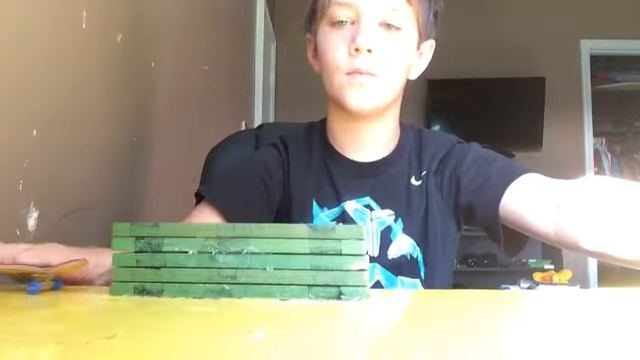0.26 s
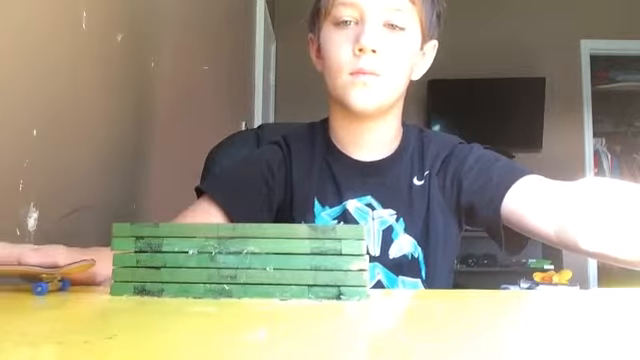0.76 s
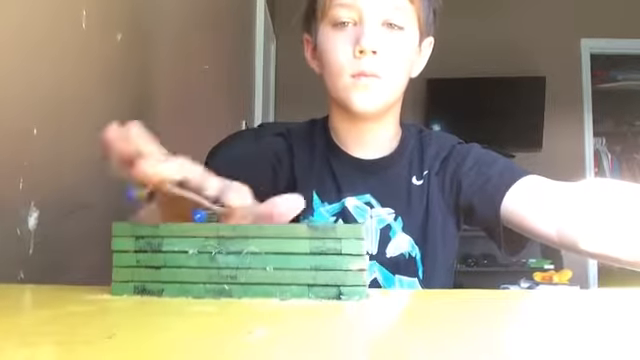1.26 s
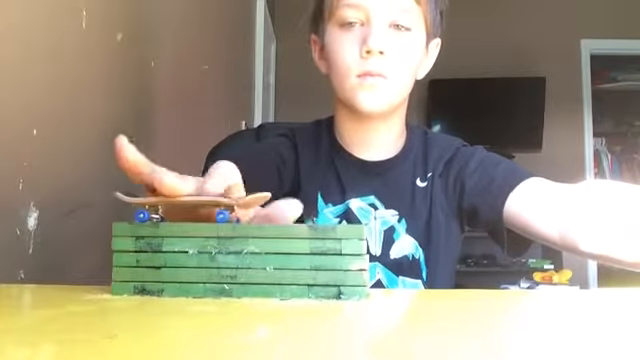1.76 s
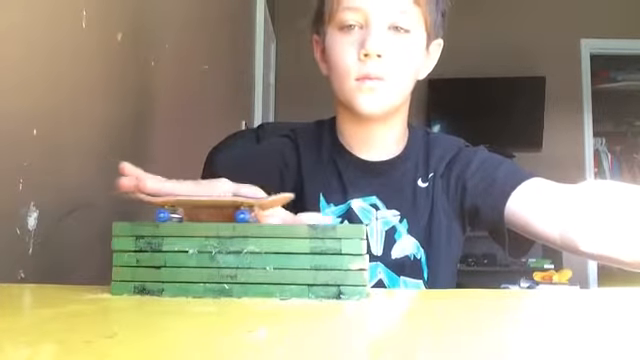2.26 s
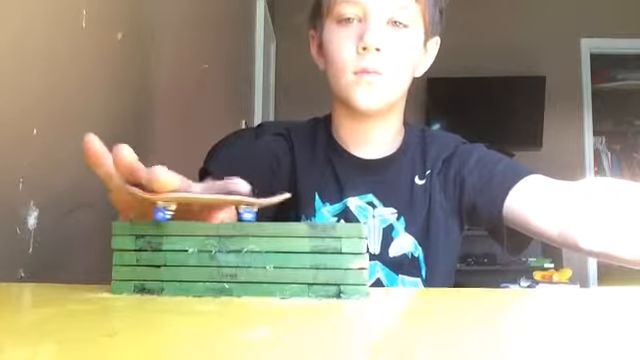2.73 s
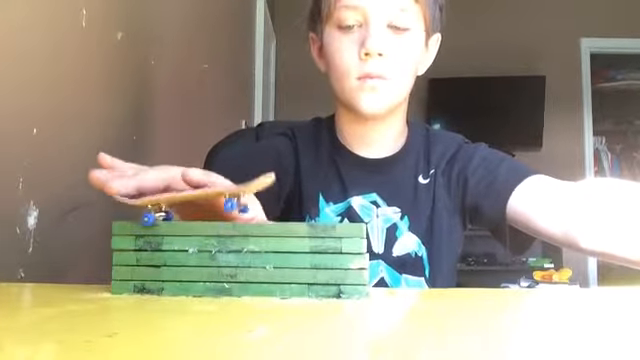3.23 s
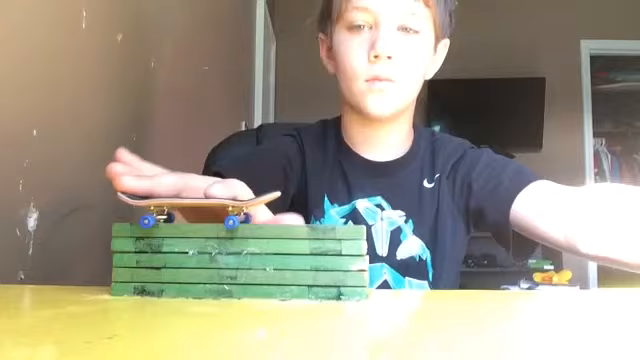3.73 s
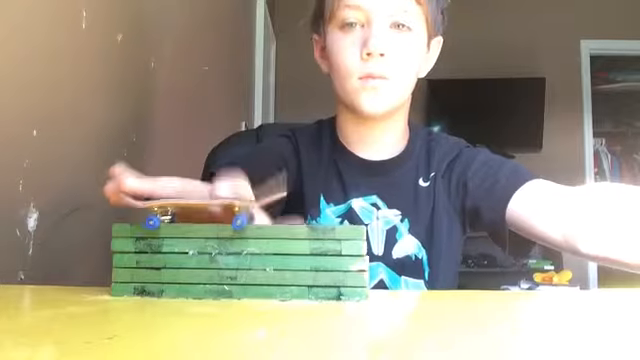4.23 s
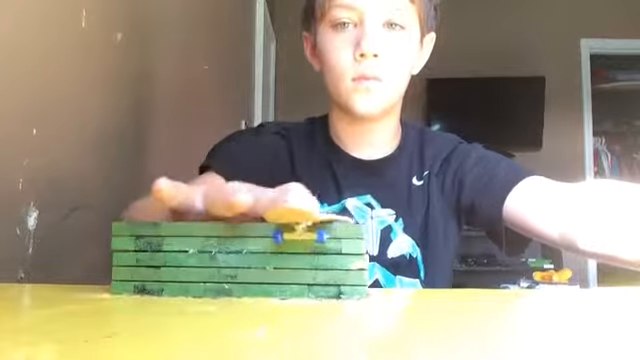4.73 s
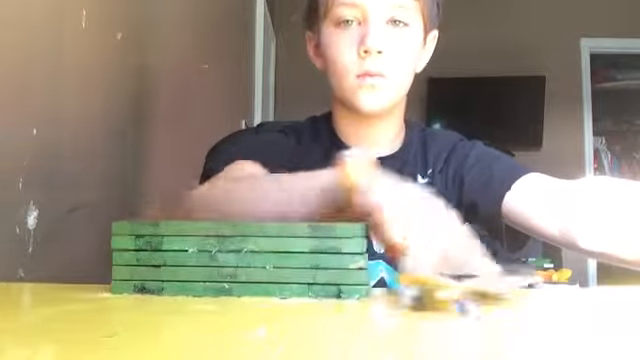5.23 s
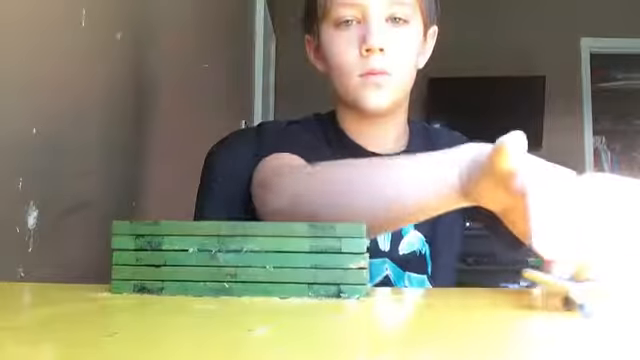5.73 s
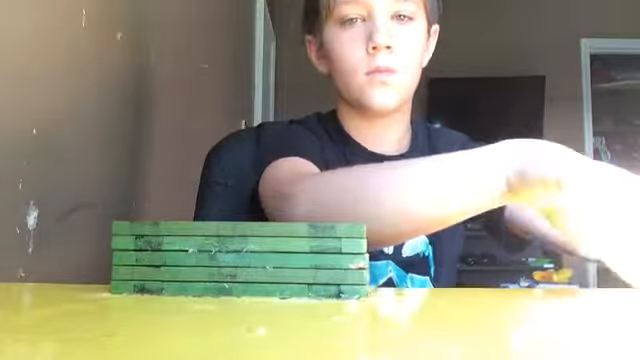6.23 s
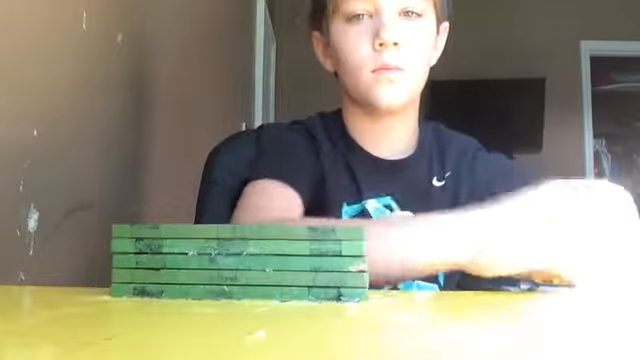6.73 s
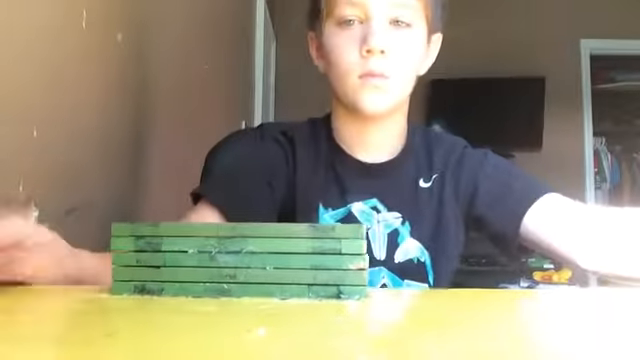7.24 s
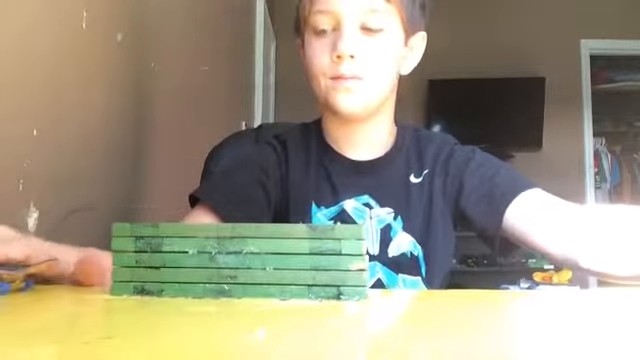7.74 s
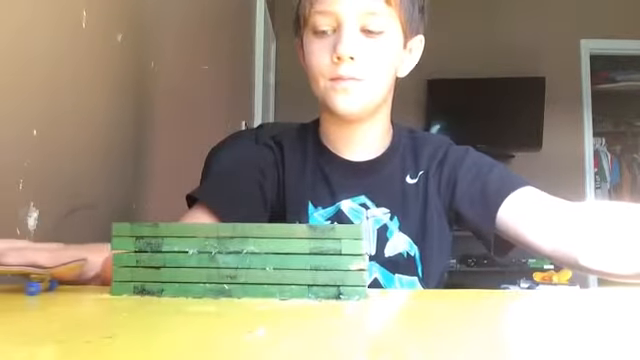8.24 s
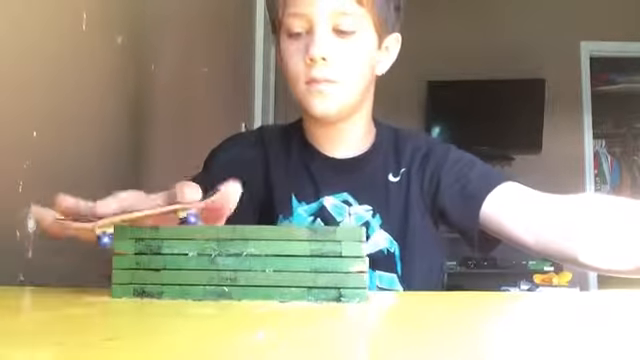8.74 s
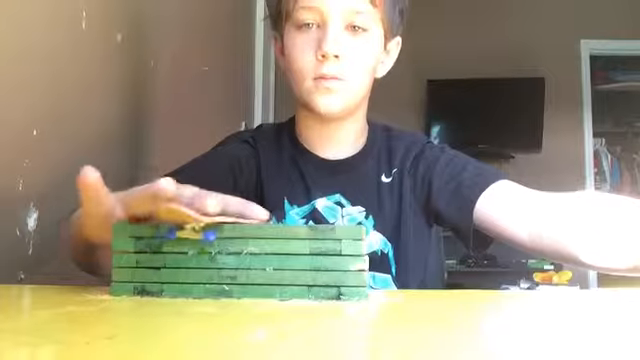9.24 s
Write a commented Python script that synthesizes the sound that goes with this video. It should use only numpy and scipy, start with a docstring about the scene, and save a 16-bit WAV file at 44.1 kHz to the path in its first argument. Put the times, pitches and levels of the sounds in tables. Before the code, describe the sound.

Close, dry wooden clacks with bright metallic clicks over very faint room hum and hiss. Small hard wheels whirr in short pushes, rattling on planks and smoother on the bare table, now and then whistling thinly. Quick rasping scrapes precede pops, and heavier landings boom low in the tabletop. Bursts of tricks alternate with quiet gaps, in a small room with short reflections.

```python
"""A brief whirr of small wheels over faint room tone, then wood clacks: a wooden fingerboard does tricks
on a table and a stack of planks, close to a small microphone in a furnished room.
Clacks, scrapes and wheels are noise filtered by the wood's resonances; the tabletop booms as decaying sines.
Wheels whirr in short pushes, rattling on the planks, and rubbing wheels whistle as narrow noise.
The recorder's limiter holds down peaks and its band limit cuts the top."""
import sys
import numpy as np
from scipy import signal
from scipy.fft import rfft, irfft, next_fast_len
from scipy.io import wavfile
from scipy.ndimage import uniform_filter1d, minimum_filter1d, map_coordinates

SR = 44100
rng = np.random.default_rng(int(sys.argv[2]) if len(sys.argv) > 2 else 0)


def file_out(sig):
    """Save sig as 16-bit WAV at sys.argv[1]."""
    # one column per channel
    cols = np.atleast_2d(sig).T
    # limit, then scale
    lim = np.clip(cols, -1, 1)
    pcm = np.round(lim * 32767).astype(np.int16)
    wavfile.write(sys.argv[1], SR, pcm)


N = 418509

# colour of deck knocks: f/Hz, gain/dB
KNOCK_COLOUR = [(250, -32), (450, -9), (650, -1.5), (1000, 0), (1500, 2.5), (2300, 2.5), (3300, 5),
                (4200, -8), (6000, -41.5)]
# colour of bright metal clicks and fine hiss: f/Hz, gain/dB
CLICK_COLOUR = [(2800, -21.5), (4700, -1.5), (7500, -3), (8500, -10), (11000, -13), (15000, -21)]
# what lies under the board: t/s, surface (0 table .. 1 planks)
SURFACE_BELOW = [(1.15, 0), (1.3, 1), (5.19, 1), (5.22, 0), (8.65, 0), (8.75, 1)]


def amp(db):
    """Decibels to gain."""
    return 10 ** (np.asarray(db) / 20)


def unit(x):
    """x at rms 1."""
    return x / np.sqrt(np.mean(x ** 2) + 1e-20)


def along(points, hz):
    """(f/Hz, value) points read on a log frequency axis."""
    f, v = np.transpose(points)
    return np.interp(np.log(hz + 1), np.log(f + 1), v)


def wobble(rate):
    """A random curve of straight lines, rate knots a second."""
    knots = rng.standard_normal(int(N * rate / SR) + 4)
    return map_coordinates(knots, [np.arange(N) * rate / SR], order=1)


def coloured(x, gain):
    """x through the causal minimum-phase filter with the given gain of frequency."""
    m = 2 * next_fast_len(len(x) // 2 + 2048)
    cepstrum = irfft(np.log(np.maximum(gain(np.fft.rfftfreq(m, 1 / SR)), 1e-6)))
    # folding the cepstrum forward in time makes the filter causal
    cepstrum[1:m // 2] *= 2
    cepstrum[m // 2 + 1:] = 0
    return irfft(rfft(x, m) * np.exp(rfft(cepstrum)), m)[:len(x)]


def resonance(hz, centre_hz, width_hz, db):
    """Gain of one peak whose power, db, adds to a flat response."""
    return np.sqrt(1 + amp(db) ** 2 / (1 + (2 * (hz - centre_hz) / width_hz) ** 2))


def wood(points, ring_db, spread_db=0):
    """Gain of a colour with the wood's resonances on it; their strengths depend on where it is touched."""
    # resonances of board, planks and table: f/Hz, width/Hz, strength/dB before ring_db and spread
    body_rings = [(158, 26, 1.5), (249.7, 8.3, 2), (331.4, 19, 5.5), (458, 63, 4), (567, 49, 3),
                  (639, 59, 5), (825, 93, 4.5), (1016, 12, -1), (1208, 55, -2), (1460, 160, 0),
                  (1772, 110, -4.5), (2192, 90, 0), (2454, 51, 1), (2728, 210, -8), (3085, 60, -4.5),
                  (5170, 130, -4), (6600, 130, -5.5)]
    strengths = ring_db + spread_db * rng.standard_normal(len(body_rings))

    def gain(hz):
        peaks = sum(amp(db + more) ** 2 / (1 + (2 * (hz - centre_hz) / width_hz) ** 2)
                    for (centre_hz, width_hz, db), more in zip(body_rings, strengths))
        return amp(along(points, hz)) * np.sqrt(1 + peaks)
    return gain


def add(track, s, sound):
    """Mix a sound into the track from time s on."""
    part = track[max(round(s * SR), 0):][:len(sound)]
    part += sound[:len(part)]


def in_room(x, wet_db, delay=0.0053):
    """x and the room's answer: decaying noise that sets in with the nearest walls, delay in seconds."""
    # decay of the furnished room: f/Hz, t60/s
    room_decay = [(100, 0.59), (260, 0.15), (700, 0.21), (1800, 0.17), (5000, 0.19), (13000, .18)]
    hz, t, z = signal.stft(rng.standard_normal(SR // 3), SR, nperseg=256)
    fade = amp(-60 * t / along(room_decay, hz)[:, None])
    tail = signal.istft(z * fade, SR, nperseg=256)[1]
    tail *= 1 - np.exp(-(np.arange(len(tail)) / SR / delay) ** 2)
    response = amp(wet_db) * tail / np.linalg.norm(tail)
    response[0] += 1  # the direct sound
    return signal.fftconvolve(x, response)


def burst(gain, t60, span, snap):
    """A sharp blow (snap) and its fast-dying rattle in the wood, at rms 1 over the first span seconds."""
    t = np.arange(SR // 8) / SR
    blow = rng.standard_normal(len(t)) * amp(-60 * t / t60) * (1 - np.exp(-t / 0.00051))
    blow /= np.linalg.norm(blow)
    blow[0] = snap
    x = coloured(blow, gain)
    return x / np.sqrt(np.mean(x[t < span] ** 2))


def room_tone():
    """The faint steady hum of the room and microphone hiss, as coloured noise."""
    # colour of the room at the microphone: f/Hz, gain/dB before a bass cut at 55 Hz
    air_colour = [(15, -40), (25, -4), (133, 0.5), (188, -1.5), (297, -3.5), (509, -9), (582, -7.5),
                  (2850, -20.5), (3530, -24), (10900, -30.5), (15500, -41)]
    noise = rng.standard_normal(N)
    return amp(-64.5) * unit(coloured(noise, lambda hz: amp(along(air_colour, hz)) * hz / np.hypot(hz, 55)))


def whistles():
    """A rubbing wheel sings faintly in one narrow, noisy band."""
    # thin whistles, before the room: start/s, end/s, level/dB, f/Hz
    songs = [(4.98, 5.177, -56, 5590), (5.06, 5.181, -52, 3700), (5.375, 5.44, -42, 1490),
             (6.685, 6.757, -54, 2830), (7.569, 7.588, -47, 1490), (7.719, 7.801, -55.5, 3280)]
    track = np.zeros(N)
    for start, end, db, centre_hz in songs:
        swell = np.hanning(max(round((end - start) * SR), 64)) ** .5
        noise = rng.standard_normal(SR // 4)
        band = coloured(noise, lambda hz: 1 / (1 + ((hz - centre_hz) / (0.068 * centre_hz)) ** 2))
        add(track, start, in_room(amp(db) * unit(swell * band[-len(swell):]), wet_db=-4.5))
    return track


def pushes():
    """Gains of whirr and rumble: each push gets under way, swells or slackens, and coasts out."""
    # fingers push the board: start/s, end/s, whirr midway/dB, swell start to end/dB, rumble re whirr/dB
    rolls = [(0.0, 0.049, -50.5, -2.5, -10), (0.315, 0.345, -56, -5, -8), (0.635, 0.675, -56.5, -2, -4.5),
             (1.091, 1.252, -43.5, 4.5, -16), (1.359, 1.405, -46.5, 2.5, 0),
             (1.452, 1.618, -50, -6.5, -11.5), (1.82, 1.892, -58, -2, -4), (2.23, 2.432, -43.5, 8, -3.5),
             (2.569, 2.66, -41, 2, -2), (2.777, 2.987, -51.5, -3, 1), (3.078, 3.192, -48, 0.5, -2),
             (3.272, 3.377, -41, -12.5, 3.5), (3.446, 3.57, -59.5, 8.5, -4), (3.628, 3.923, -47, 11, -2),
             (4.227, 4.258, -53.5, 9, 6), (4.279, 4.531, -41.5, -10, -8.5), (4.593, 4.631, -35, -5, 0),
             (4.746, 5.149, -53.5, 13.5, 0), (5.22, 5.418, -35, -7.5, -23), (5.446, 5.599, -47.5, 10, -20),
             (5.711, 5.732, -46, 1, -15), (5.809, 6.07, -53.5, -0.5, -6.5),
             (6.172, 6.255, -40.5, 14.5, -14), (6.26, 6.43, -40, -12.5, -19), (6.547, 6.736, -37, 1, -14),
             (7.275, 7.346, -36.5, -8, -17), (7.485, 7.503, -46, 8, -10), (7.615, 7.675, -46.5, -3.5, -7.5),
             (7.746, 7.785, -47, 5, -8), (8.03, 8.114, -54.5, -3.5, -1), (8.341, 8.425, -53.5, 3.5, -4),
             (8.559, 8.59, -49.5, -2, -18), (8.738, 8.876, -48, -5, 4.5), (9.031, 9.13, -46.5, -7, 2),
             (9.198, 9.5, -47.5, 6.5, 4)]
    rise_s, coast_s = 0.018, .022  # time constants before the start and after the end
    whirr_power, rumble_power = np.zeros(N), np.zeros(N)
    t = np.arange(-SR // 8, SR) / SR
    for start, end, db, swell_db, rumble_db in rolls:
        length = max(end - start, .005)
        edges = np.exp(np.minimum(t, 0) / rise_s - np.maximum(t - length, 0) / coast_s)
        gain = edges * amp(db + swell_db * (np.clip(t / length, 0, 1) - .5))
        heard = start + t >= 0
        add(whirr_power, start + t[0], gain[heard] ** 2)
        add(rumble_power, start + t[0], (amp(rumble_db) * gain[heard]) ** 2)
    return np.sqrt(whirr_power), np.sqrt(rumble_power)


def rattle():
    """The loose trucks tick at random, at rms 1: one wooden tick repeated at uneven strengths."""
    ticks_per_s, spread_db, click_db = 19, 3.5, -10.5
    strengths = amp(spread_db * np.clip(rng.standard_normal(N), -2, 2))
    ticks = (rng.random(N) < ticks_per_s / SR) * strengths
    deck = wood(KNOCK_COLOUR, ring_db=4.5)
    tick = burst(lambda hz: deck(hz) + amp(click_db + along(CLICK_COLOUR, hz)), t60=0.023, span=.005, snap=0.66)
    return unit(signal.fftconvolve(ticks, tick)[:N])


def wheels():
    """Hard wheels run over the grain: gritty and rattling on planks, smoother with added rings on the table."""
    # colour of the whirr: f/Hz, gain/dB
    whirr_colour = [(350, -29), (700, -1.5), (1000, -3), (1400, 1), (2300, -1.5), (3200, -12), (4200, -13),
                    (7000, -22.5), (10000, -32), (15000, -41.5)]
    # colour of the low rumble: f/Hz, gain/dB
    rumble_colour = [(20, -52), (45, -22), (100, -19), (230, -11), (350, -1), (600, -2.5), (900, -6.5),
                     (1800, -31)]
    # resonances of wheels on the bare table: f/Hz, width/Hz, strength/dB
    table_rings = [(1150, 67, 10), (1530, 230, 2), (3230, 270, 11)]
    rattle_db, hiss_db = -12, -25  # relative to the whirr
    whirr_gain, rumble_gain = pushes()
    on_planks = np.interp(np.arange(N) / SR, *np.transpose(SURFACE_BELOW))
    body = wood(whirr_colour, ring_db=6.5)
    # the planks are rough, so the wheels jolt and crunch there
    bumps = amp(1.6 * wobble(40) + 6.6 * wobble(220))
    grit = rng.standard_normal(N) * (rng.random(N) < 5000 / SR)
    planks = unit(coloured(bumps * grit, body)) + amp(rattle_db) * rattle()
    glide = amp(1.9 * wobble(60) + 3.6 * wobble(260)) * rng.standard_normal(N)

    def table_gain(hz):
        return body(hz) * np.prod([resonance(hz, *ring) for ring in table_rings], axis=0)
    table = unit(coloured(glide, table_gain))
    hiss = unit(coloured(bumps * grit, lambda hz: amp(along(CLICK_COLOUR, hz))))
    rolling = np.sqrt(on_planks) * planks + np.sqrt(1 - on_planks) * table
    whirr = whirr_gain * (rolling + amp(hiss_db) * hiss)
    rumble = rumble_gain * unit(coloured(bumps * rng.standard_normal(N), wood(rumble_colour, ring_db=13)))
    return in_room(whirr + rumble, wet_db=-11)[:N]


def booms():
    """The weight of hand and board rings the tabletop in one low band of three decaying partials."""
    # tabletop booms: t/s, level before attack and decay/dB, f/Hz
    loads = [(3.561, -46.5, 160), (4.438, -30, 264), (4.58, -22.5, 246.3), (6.545, -30, 262),
             (6.614, -29.5, 204), (6.647, -32.5, 173), (6.772, -36, 252), (7.237, -31.5, 148.2),
             (7.3, -36, 194), (8.669, -31.5, 219.4), (8.87, -44.5, 158), (9.08, -31, 132)]
    attack_s, t60_s, width_hz = 0.0077, 0.18, 41  # width: furthest an outer partial lies from the middle
    track = np.zeros(N)
    t = np.arange(SR // 3) / SR
    for s, db, hz in loads:
        partials = hz + width_hz * np.array([-1, 0, 1]) * rng.uniform(0.79, 1, 3)
        sines = np.sin(2 * np.pi * (partials[:, None] * t + rng.random((3, 1))))
        ring = np.array([.5, 1, .5]) @ sines
        add(track, s, amp(db) * unit(ring) * (1 - np.exp(-t / attack_s)) * amp(-60 * t / t60_s))
    return track


def scrapes():
    """Wood sticks and slips in quick uneven grains, swelling until it lets go."""
    # tail dragged before a pop, or deck sliding: start/s, end/s, level/dB, centre f/Hz, hiss re rasp/dB
    # (level is before a 9 dB cut and the room, hiss before a 5.5 dB cut)
    drags = [(1.074, 1.093, -18.5, 1730, -12), (1.188, 1.221, -25, 1920, -15),
             (2.641, 2.668, -26, 2070, -13), (4.281, 4.306, -18.5, 1860, -6),
             (4.373, 4.406, -17.5, 2020, -27), (4.602, 4.631, -28.5, 740, -22),
             (5.114, 5.159, -21, 1400, -15), (5.275, 5.396, -37.5, 2300, -12.5),
             (6.215, 6.291, -43, 1550, -16), (6.387, 6.41, -24, 1080, -18.5),
             (6.409, 6.431, -19.5, 1010, -20), (6.552, 6.616, -31, 1890, -5),
             (6.705, 6.768, -23.5, 2493, -6), (7.239, 7.247, -15, 3200, -1),
             (8.582, 8.612, -14.5, 1640, -10.5), (9.012, 9.055, -19.5, 804, -16),
             (9.279, 9.496, -42, 865, -9.5)]
    track = np.zeros(N)
    for start, end, db, centre_hz, hiss_db in drags:
        u = np.linspace(0, 1, max(round((end - start) * SR), 64))
        slips = (rng.standard_normal(SR // 3) * (rng.random(SR // 3) < 9000 / SR))[:len(u)]
        body = wood(KNOCK_COLOUR, ring_db=4.0, spread_db=8.0)
        rasp = unit(coloured(slips, lambda hz: body(hz) * resonance(hz, centre_hz, width_hz=380, db=14.0)))
        hiss = unit(coloured(slips, lambda hz: amp(along(CLICK_COLOUR, hz))))
        pressure = unit(u ** 0.82 * np.minimum(1, 8 * (1 - u)))
        scrape = amp(db - 9.0) * pressure * (rasp + amp(hiss_db - 5.5) * hiss)
        add(track, start, in_room(scrape, wet_db=-7.5))
    return track


def contacts():
    """Every blow as (s, level dB, thud dB, click dB, t60 s, ring Hz, thud Hz); the surface pitches clack thuds."""
    # deck and trucks clack down: t/s, level/dB, thud re knock/dB, click re knock/dB, deck ring f/Hz
    landings = [(0.2375, -34.5, -13, -8, 1700), (0.4492, -46, -14, -20, 1260),
                (1.03, -33, -25, -16.5, 1410), (1.1289, -17.5, -22, -9.5, 2160),
                (1.16, -18, -17, -4.5, 2840), (1.1726, -19.5, -13.5, -19, 2870),
                (1.1864, -18, -18.5, -8.5, 2250), (1.1967, -21, -19.5, -9, 1450),
                (1.2108, -21.5, -7.5, -25.5, 2350), (1.4193, -17, -24, -8, 3310),
                (1.4933, -32.5, -45, -12, 860), (1.5069, -31.5, -24, -12, 820),
                (2.0606, -33.5, -12, -39, 1370), (2.259, -37.5, -9, -25, 2240),
                (2.3653, -42, -16, -23, 860), (2.3817, -33, -25, -22.5, 724),
                (2.5601, -20.5, -29, -7, 2420), (2.6217, -28.5, -10.5, -23, 755),
                (2.6455, -30.5, -7, -7, 2130), (2.6636, -22.5, -11.5, -15.5, 740),
                (2.768, -26, -12.5, -26, 860), (2.9087, -34.5, -7, -19.5, 800),
                (2.9293, -14, -20, -17, 1270), (2.9348, -14, -17.5, -17, 2700),
                (3.1153, -25.5, -18.5, -18.5, 1580), (3.1676, -38.5, -14, -18.5, 1600),
                (3.249, -21, -33.5, -24.5, 2080), (3.2571, -22.5, -27.5, -19, 2130),
                (3.2687, -21, -17.5, -16.5, 2280), (3.3387, -34, -18.5, -16, 2230),
                (3.39, -36.5, -14, -24, 2170), (3.5605, -32.5, -7.5, -31, 1320),
                (3.7165, -35.5, -6.5, -18, 1550), (3.7455, -30.5, -17, -17, 1600),
                (3.783, -28.5, -13, -17.5, 1680), (3.838, -31, -17, -25.5, 740),
                (3.9167, -29, -28, -19, 1620), (4.2989, -21, -11.5, -13, 740), (4.323, -21, -19, -15, 626),
                (4.3589, -17, -17.5, -21.5, 1580), (4.4107, -11, -19.5, -15, 1380),
                (4.43, -18, -19, -18.5, 834), (4.4383, -14, -19, -11, 840), (4.5776, -16.5, -6, -18, 710),
                (4.6011, -24, -5, -18.5, 890), (5.1236, -29, -11.5, -17, 1370),
                (5.1674, -12.5, -19, -4.5, 1900), (5.182, -16.5, -7.5, -3, 3080),
                (5.1948, -11.5, -19, -5.5, 2500), (5.3143, -31, -20, -11.5, 1430),
                (5.5482, -35.5, -17, -19, 1600), (5.971, -52.5, -20, -8, 1500),
                (6.0265, -41, -33, -19, 1130), (6.4554, -31.5, -20.5, -6.5, 3220),
                (6.5661, -22, -12.5, -9, 1870), (6.595, -26, -19, -13.5, 1750),
                (6.6066, -25, -11.5, -10.5, 1630), (7.2393, -13, -23.5, -4, 2200),
                (7.2755, -15.5, -21, -8.5, 1460), (7.2927, -23, -9.5, -2.5, 1620),
                (7.5377, -41.5, -30, -11, 1620), (7.6183, -39.5, -22, -15.5, 1364),
                (7.7663, -38, -24, -21.5, 671), (8.322, -52, -17, -12.5, 1500),
                (8.5229, -38, -31, -13.5, 1310), (8.6674, -12.5, -21, -10.5, 1270),
                (8.6855, -20.5, -12, -21, 1150), (8.7073, -13, -12, -8.5, 940),
                (8.7502, -28, -5.5, -28.5, 1030), (8.8258, -36, -32, -6.5, 2500),
                (8.8531, -32.5, -6.5, -8.5, 1240), (8.9319, -29, -13, -25, 1470),
                (9.059, -14.5, -10.5, -16.5, 1700), (9.0779, -15.5, -4, -13, 650),
                (9.227, -39, -40, -17, 770)]
    # the tail snaps against the table and the board jumps: t/s, level/dB
    snaps = [(1.0965, -22.5), (6.7707, -21.5), (7.2348, -21.5), (8.6126, -21)]
    # the board is pressed flat onto all four wheels, a dull thump: t/s, level/dB, click re knock/dB
    presses = [(1.6557, -37, -9.5), (1.9172, -29, -8.5), (2.4392, -32.5, -27.5), (2.7975, -39.5, -14),
               (2.9954, -37.5, -15), (4.5858, -22, -14), (6.6298, -23.5, -19), (9.0868, -26.5, -9)]
    # a harder clack dies a little sooner: level/dB, t60/s
    clack_decay = [(-41, 0.041), (-16.5, .034)]
    table_thud_hz, planks_thud_hz = 443, 545

    def thud_hz(s):
        on_planks = np.interp(s, *np.transpose(SURFACE_BELOW))
        return np.interp(on_planks, [0, 1], [table_thud_hz, planks_thud_hz])
    # columns as in the docstring
    pops = [(s, db, -6.5, 4, 0.013, 1560, table_thud_hz) for s, db in snaps]
    thumps = [(s, db, -5.5, click_db, 0.035, 550, 344) for s, db, click_db in presses]
    clacked = [(s, db, thud_db, click_db, np.interp(db, *np.transpose(clack_decay)), ring_hz, thud_hz(s))
               for s, db, thud_db, click_db, ring_hz in landings]
    return pops + thumps + clacked


def clacks():
    """Each contact knocks the deck, thuds in the surface below and clicks on the metal trucks."""
    # colour of thuds in the surface: f/Hz, gain/dB
    thud_colour = [(25, -35.5), (55, -19), (85, -0.5), (150, -5), (300, -5.5), (520, -4), (750, -20),
                   (1500, -38)]
    graze_db, graze_rise_s = -14, 0.0028
    track = np.zeros(N)
    before = np.arange(-SR // 50, 0) / SR
    for s, db, thud_db, click_db, t60, ring_hz, thud_hz in contacts():
        # the grip of the fingers and the spot that is hit choose which rings stand out
        deck = wood(KNOCK_COLOUR, ring_db=5.5, spread_db=2.5)
        below = wood(thud_colour, ring_db=10.5, spread_db=-1.0)
        metal = wood(CLICK_COLOUR, ring_db=-0.5, spread_db=3.0)
        # a contact cushioned by the wheels has little click, and a duller knock too
        soft_hz = np.clip(4500 * amp(.4 * (click_db + 14.5)), 1500, 9000)
        # only heavy blows set the whole table moving; light taps lack bass
        bass_hz = np.interp(db, [-30, -22], [270, 45])
        # the harder the metal strikes, the higher its click reaches
        tilt = 0.44 * np.clip(click_db + 6.5, -12, 12)  # dB per octave

        def knock_gain(hz):
            ring = resonance(hz, ring_hz, width_hz=360, db=10.5)
            return deck(hz) * ring / np.hypot(1, (hz / soft_hz) ** 2)

        def thud_gain(hz):
            ring = resonance(hz, thud_hz, width_hz=38, db=9.0)
            return below(hz) * ring / np.hypot(1, (bass_hz / (hz + 1)) ** 3)

        def click_gain(hz):
            return metal(hz) * amp(tilt * np.log2((hz + 1000) / 7000))
        knock = burst(knock_gain, t60, span=0.0055, snap=1.0)
        thud = burst(thud_gain, t60=0.053, span=0.013, snap=0.86)
        click = burst(click_gain, 0.56 * t60, span=0.0042, snap=0.64)
        blow = amp(db) * (knock + amp(thud_db) * thud + amp(click_db) * click)
        add(track, s, in_room(blow, wet_db=-10.0))
        # the board grazes the surface just before it hits
        brush = rng.standard_normal(len(before))
        graze = unit(coloured(brush, lambda hz: deck(hz) + amp(click_db + along(CLICK_COLOUR, hz))))
        add(track, s + before[0], amp(db + graze_db) * np.exp(before / graze_rise_s) * graze)
    return track


def scene():
    """Everything at the one microphone."""
    background = room_tone() + whistles() + wheels()
    return (background + booms() + scrapes() + clacks())[None]


def record(dry):
    """A fast limiter, its gain smoothed over 45 samples (1 ms), then the recorder's band limit."""
    ceiling, top_hz = .7, 15600
    needed = np.minimum(1, ceiling / (np.abs(dry) + 1e-9))
    gain = uniform_filter1d(minimum_filter1d(needed, size=45), size=45)
    m = next_fast_len(N + SR // 2)
    passed = np.fft.rfftfreq(m, 1 / SR) < top_hz
    return irfft(rfft(dry * gain, m) * passed, m)[:, :N]


dry = scene()
out = record(dry)
file_out(out)
```